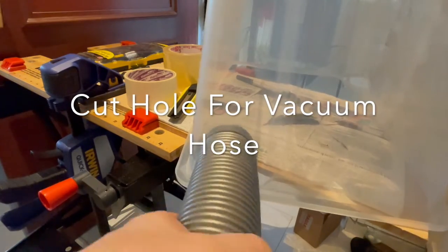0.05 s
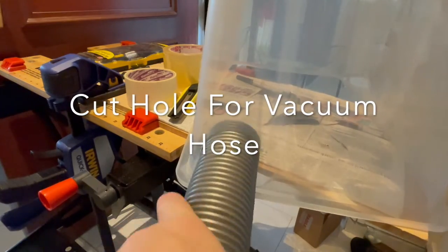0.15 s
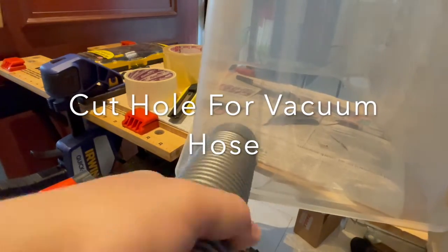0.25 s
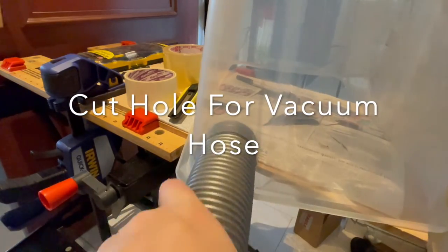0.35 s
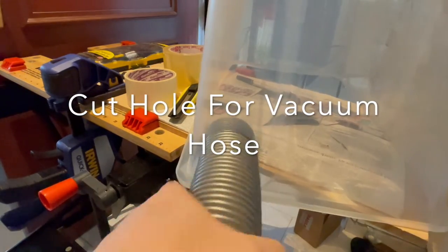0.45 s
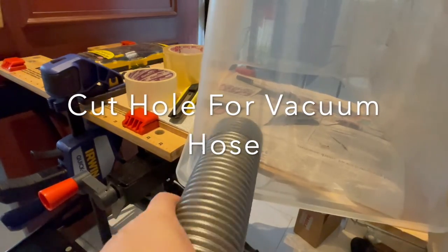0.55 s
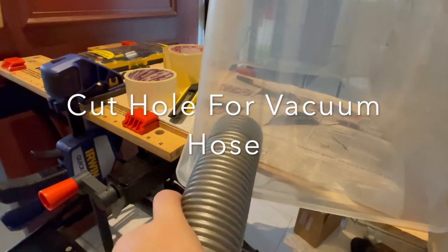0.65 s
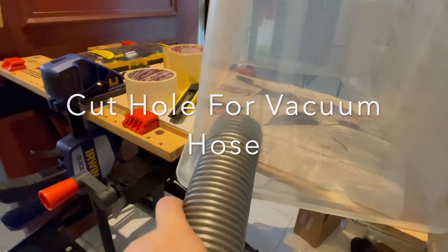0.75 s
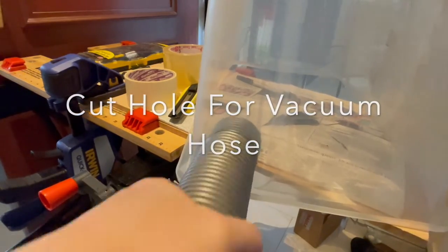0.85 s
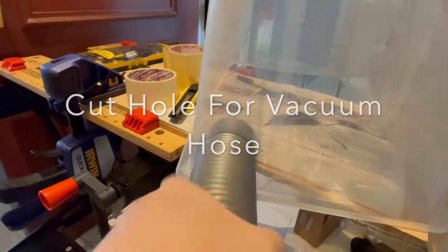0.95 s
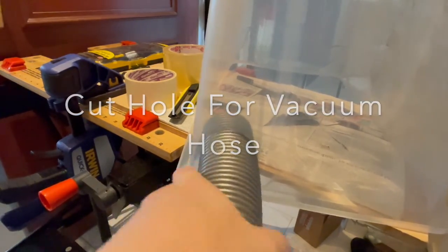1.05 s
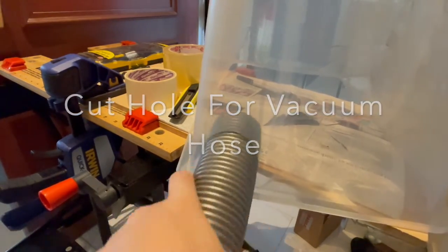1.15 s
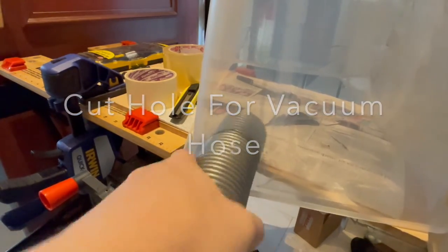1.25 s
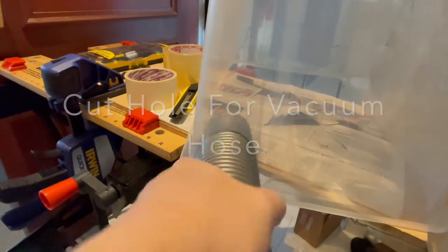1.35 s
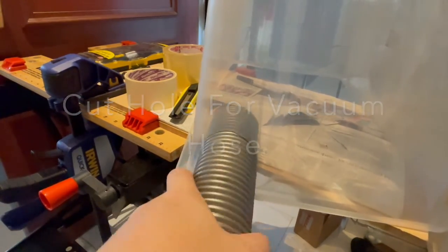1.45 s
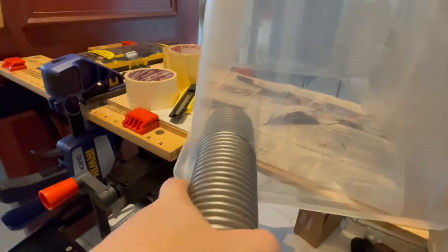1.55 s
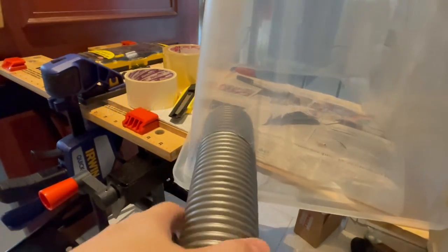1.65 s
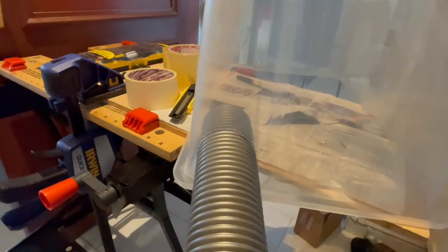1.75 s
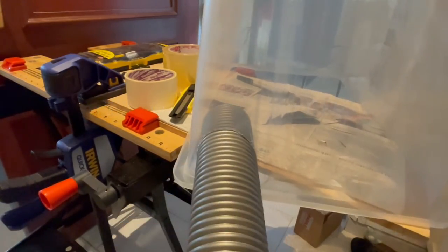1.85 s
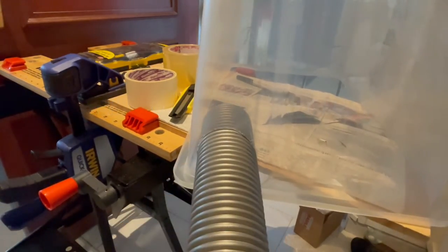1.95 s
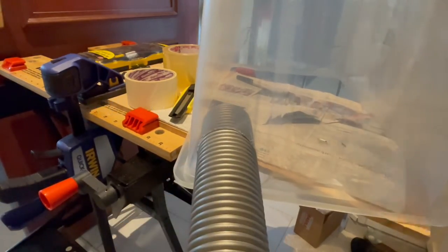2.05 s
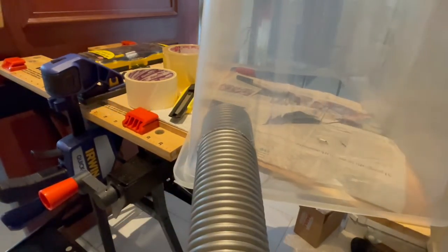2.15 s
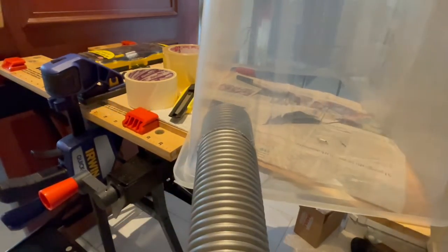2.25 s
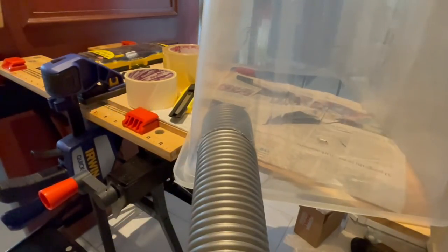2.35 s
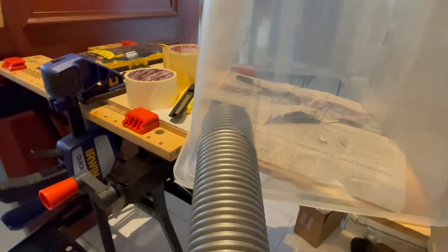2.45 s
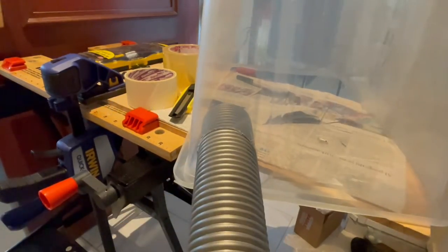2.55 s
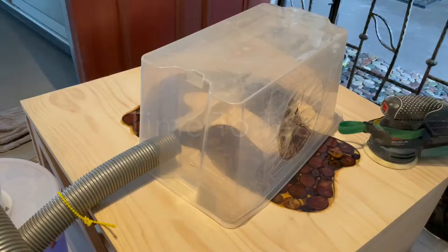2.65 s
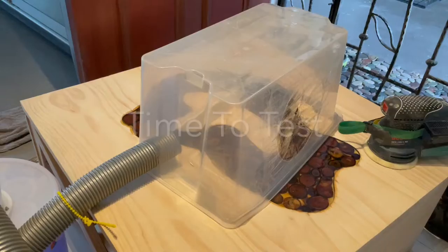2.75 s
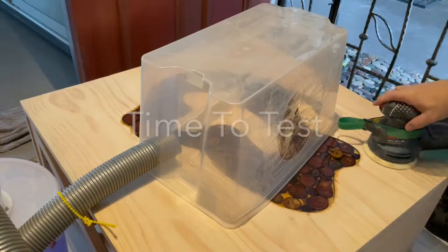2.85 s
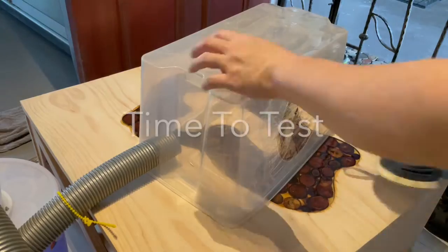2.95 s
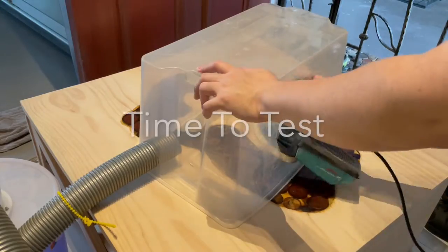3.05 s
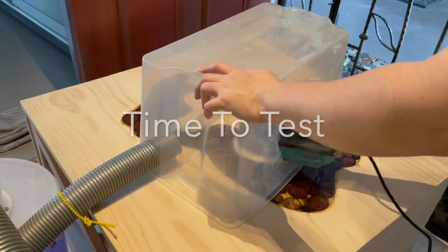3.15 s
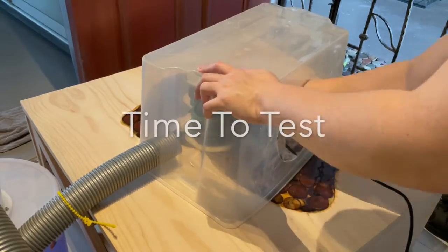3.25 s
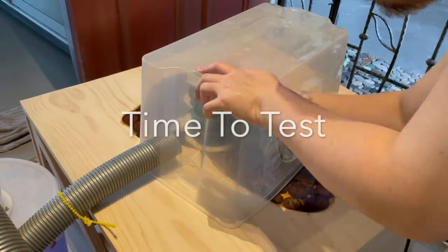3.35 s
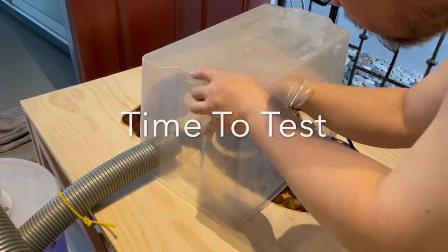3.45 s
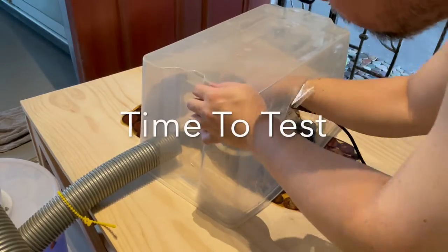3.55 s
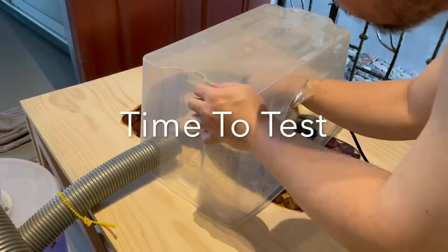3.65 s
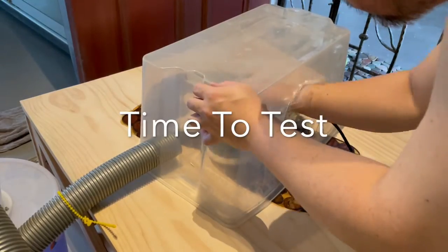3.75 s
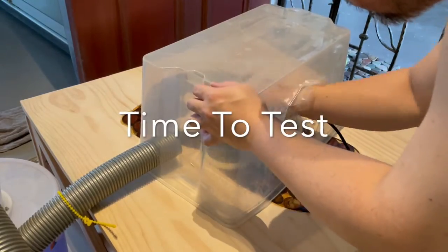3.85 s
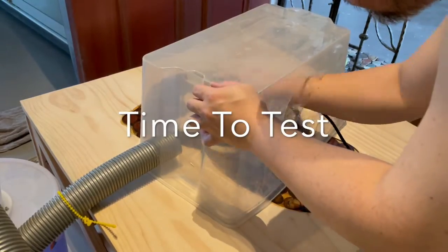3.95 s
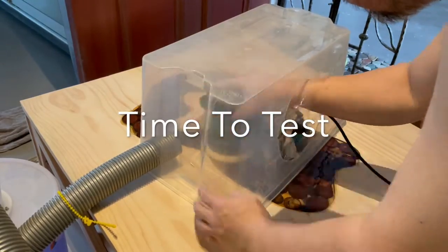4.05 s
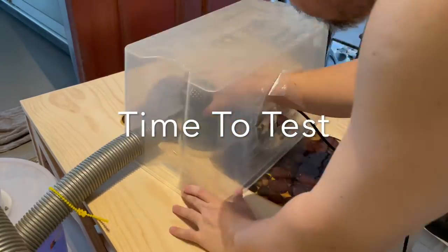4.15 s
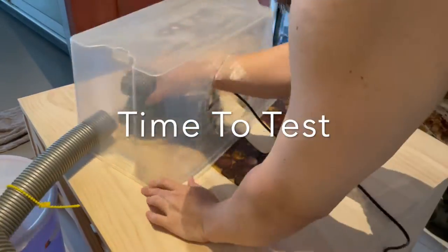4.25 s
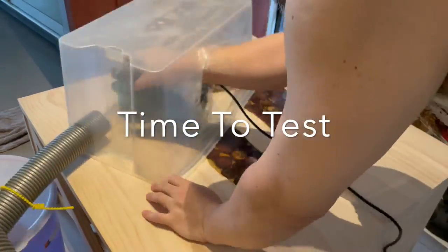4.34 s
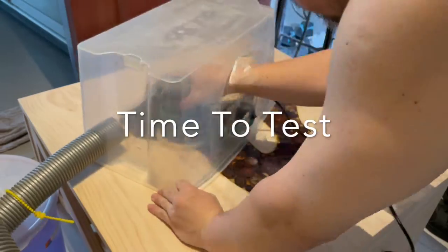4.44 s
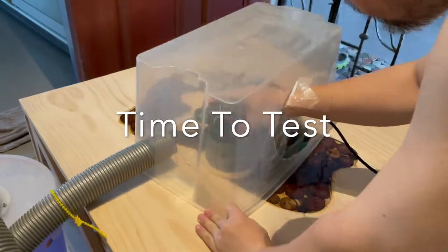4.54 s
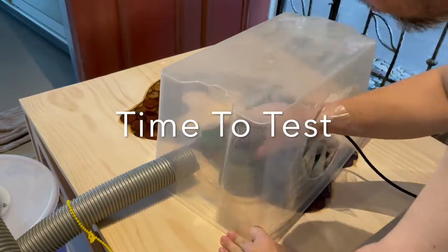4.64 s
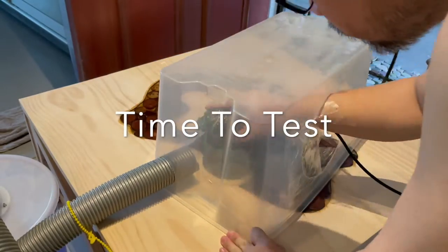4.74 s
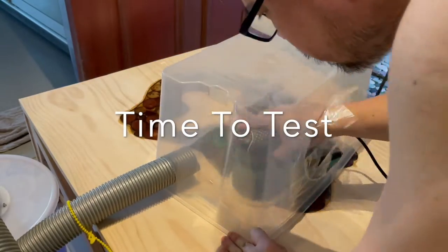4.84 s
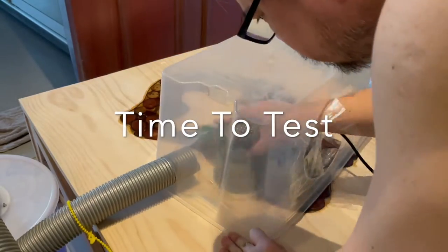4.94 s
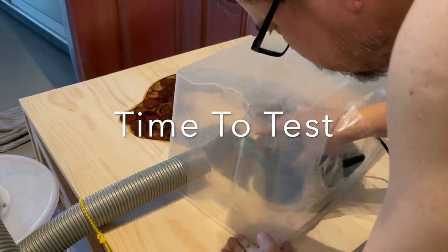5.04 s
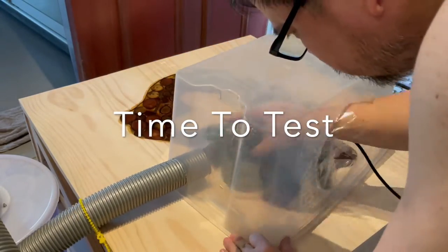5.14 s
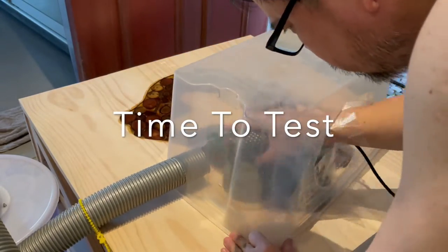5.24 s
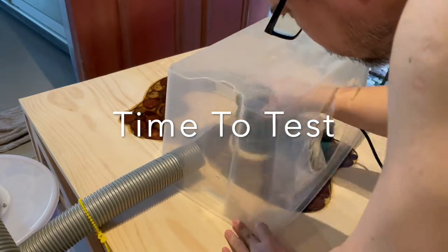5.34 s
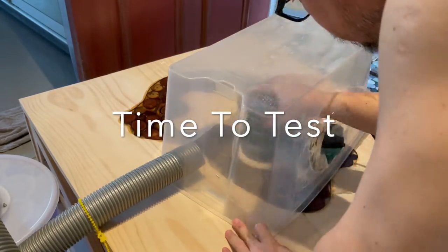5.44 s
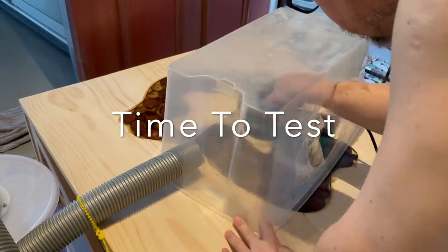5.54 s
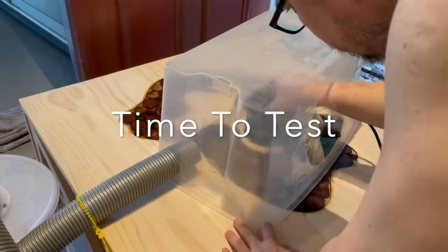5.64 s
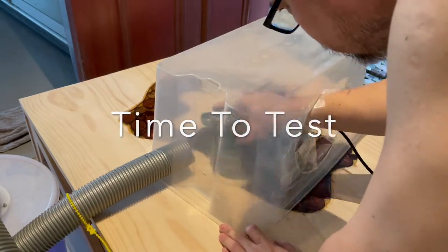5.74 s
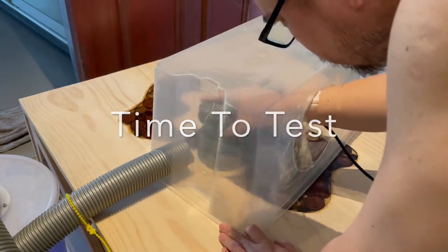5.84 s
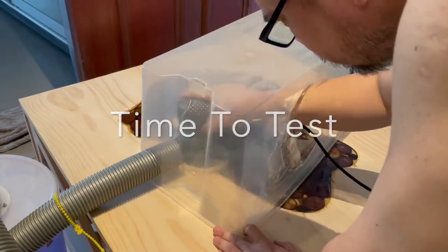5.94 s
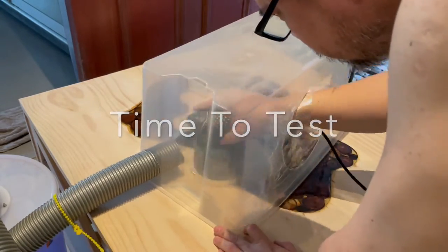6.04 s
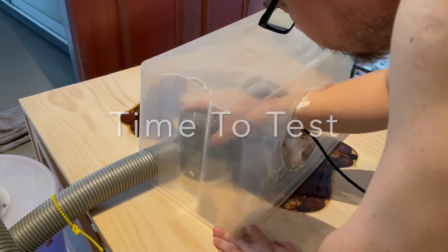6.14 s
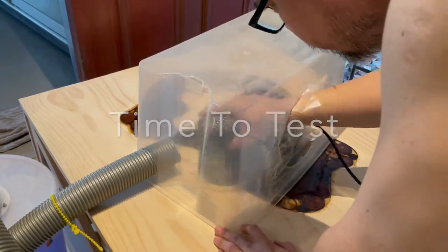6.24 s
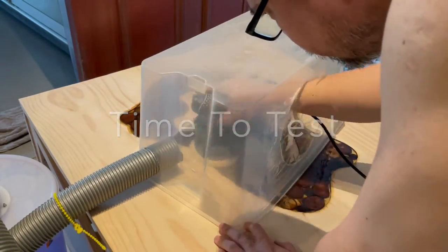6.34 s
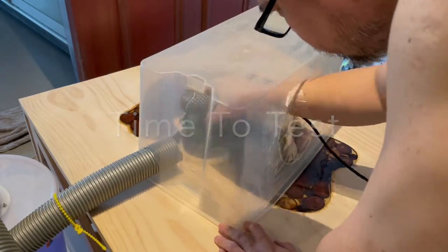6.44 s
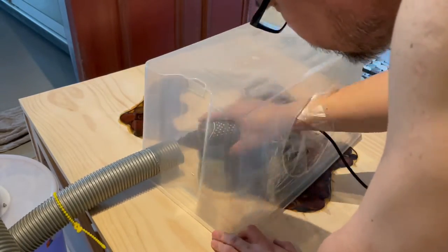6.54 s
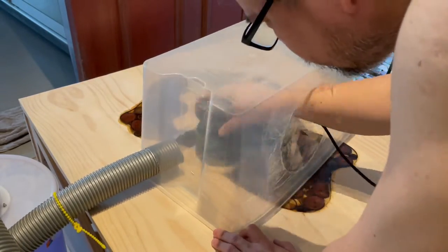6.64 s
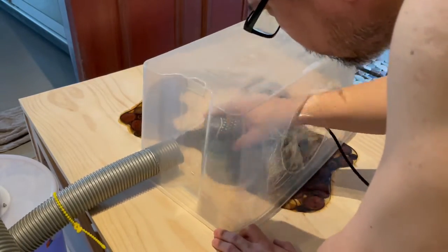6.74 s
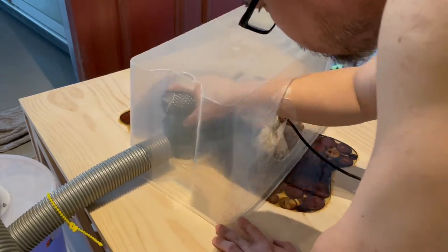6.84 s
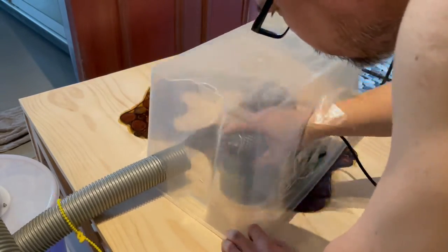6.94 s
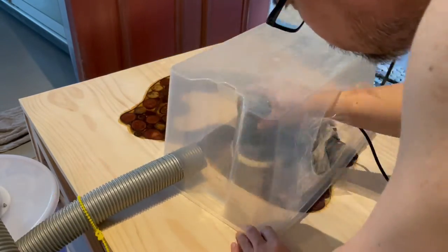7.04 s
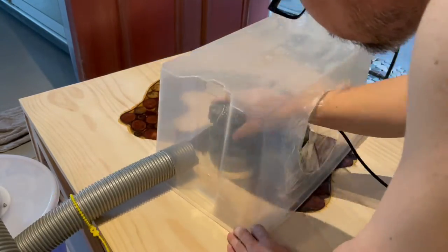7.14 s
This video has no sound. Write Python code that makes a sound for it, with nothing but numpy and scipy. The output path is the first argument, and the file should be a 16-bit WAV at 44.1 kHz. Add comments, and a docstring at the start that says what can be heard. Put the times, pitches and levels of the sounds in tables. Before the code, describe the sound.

A ribbed hose snaps and scrapes through a plastic box, then abruptly vacuum rush and whistle, joined by a power tool spinning up to a whine.

```python
"""In a workshop, a ribbed vacuum hose is worked into a hole in a plastic box: it rubs and groans, and each rib
snaps past the edge, sending dispersive bending waves through the thin wall and ringing its modes.
After an abrupt change of scene a workshop vacuum sucks air through the box: coloured noise, motor tones, a whistle.
A router inside hums, then spins up to a high, fluttering stack of partials that sags a little under load,
while the box is nudged over the bench with dull ticks and short rings."""
import sys
import numpy as np
from scipy import signal
from scipy.fft import rfft, irfft, next_fast_len
from scipy.io import wavfile

SR = 44100
rng = np.random.default_rng(int(sys.argv[2]) if len(sys.argv) > 2 else 0)


def to_wav(sig):
    """Store sig (one row per channel, or 1-D mono) as 16-bit WAV at the path in sys.argv[1].

    Samples outside -1..1 are clipped; the rate is SR.
    """
    pcm = np.clip(np.atleast_2d(sig), -1, 1) * 32767
    pcm = np.round(pcm).astype(np.int16)
    wavfile.write(sys.argv[1], SR, pcm.T)  # frames by channels


N = 317079
T = np.arange(N) / SR  # seconds
CHANGE_S = 2.634  # the fitting of the hose gives way to the machines


def undb(db):
    """Decibels to gain."""
    return 10 ** (np.asarray(db) / 20)


def unit(x):
    """Scale to an rms of one."""
    return x / np.sqrt(np.mean(np.abs(x) ** 2))


def curve(rows):
    """Rows of (seconds, value), joined by straight lines in time."""
    return np.interp(T, *np.transpose(rows))


def colour(points, hz):
    """Gain at the given frequencies of a spectrum drawn as (Hz, dB) points."""
    point_hz, db = np.transpose(points)
    return undb(np.interp(np.log(hz + 1), np.log(point_hz), db))


def pan(db):
    """Left and right gains for a level difference, left minus right."""
    return undb(np.array([[db], [-db]]) / 2)


def noise(points, wide_hz, spread=1.0, size=N, ripple_db=0, ripple_hz=70):
    """Coloured stereo noise, alike on both sides in the bass and wider above wide_hz; crowded resonances ripple it."""
    padded = next_fast_len(size, True)
    hz = np.fft.rfftfreq(padded, 1 / SR)
    knots = rng.standard_normal(1024)
    bumpy = np.interp(hz / ripple_hz, np.arange(len(knots)), knots)
    ripple = undb(ripple_db * hz / (hz + 1500) * bumpy)  # stronger in the treble
    mid, side = rfft(rng.standard_normal((2, padded))) * colour(points, hz) * ripple
    mid = irfft(mid, padded)
    side = irfft(side * spread * hz / (hz + wide_hz), padded)
    return np.array([mid + side, mid - side])[:, :size] / np.std(mid)


def walk(rate):
    """Smooth random wandering with a spread near one, taking rate new values a second."""
    knots = rng.standard_normal(int(N / SR * rate) + 2)
    return 1.196 * np.interp(T * rate, np.arange(len(knots)), knots)


def flutter(width_hz, slowest_hz=1, size=16384):
    """Random swings of strength and phase that give a tone skirts; width_hz sets how far they reach."""
    hz = np.abs(np.fft.fftfreq(size, T[-1] / size))
    skirt = np.exp(-hz / (2 * width_hz)) * hz / (hz + slowest_hz)
    chance = rng.standard_normal(size) + 1j * rng.standard_normal(size)
    swings = unit(np.fft.ifft(chance * skirt))
    return np.interp(T, np.linspace(0, T[-1], size), swings)


def turns(hz):
    """Running phase in radians of a pitch curve."""
    return 2 * np.pi * np.cumsum(hz) / SR


def fade(t, t60):
    """Exponential decay, 60 dB down after t60 seconds."""
    return np.exp(-np.log(1000) * t / t60)


def add(out, s, sound):
    """Mix a short sound in at time s."""
    start = max(int(s * SR), 0)
    out[:, start:start + sound.shape[1]] += sound[:, :N - start]


def scatter(start_s, end_s, count):
    """Rows of (time, two random values) for events strewn unevenly over a span."""
    chance = rng.random((count, 3))
    times = start_s + (end_s - start_s) * (np.arange(count) + chance[:, 0]) / count
    return np.column_stack([times, np.sqrt(3) * (2 * chance[:, 1:] - 1)])


# How hard the hose rubs in the hole. Each row: time in seconds, level in dB.
RUB = [(0.0, -46.5), (0.43, -35), (0.56, -44), (0.8, -46), (0.97, -41), (1.35, -35), (1.55, -46),
       (2.0, -54.5), (2.4, -62)]
# Colour of the scrape. Each row: frequency in Hz, relative level in dB.
RUB_COLOUR = [(40, -16), (100, -6), (165, -3), (320, -0.5), (500, -2), (800, -6.5), (2000, -11.5),
              (4000, -37), (9000, -31.5), (15000, -27)]
# The wall groaning as a rib drags. Each row: start in seconds, length in seconds, pitch in Hz, peak level in dB.
GROANS = [(0.45, 0.096, 166.4, -31), (0.715, 0.074, 164.7, -34), (0.805, 0.079, 160.5, -25.5),
          (1.718, 0.052, 171, -29), (2.597, 0.026, 121, -38)]


def rubbing(rub_db=-3, grain_db=3, slips_per_s=90, slip_db=-8, slip_t60=0.016):
    """The hose scrapes unevenly between snaps, slips in tiny ticks and now and then makes the wall groan."""
    pressure = undb(curve(RUB))
    scrape = noise(RUB_COLOUR, 830) * undb(rub_db + grain_db * walk(130))
    slips = (rng.random(N) < slips_per_s / SR) * rng.uniform(.2, 1.8, N)
    slips = signal.fftconvolve(slips, fade(T[:2048], slip_t60))[:N]
    tick_colour = [(200, -8), (500, 5), (1900, -1), (4000, -3), (9000, -16), (14000, -18)]  # Hz, dB
    ticks = noise(tick_colour, 900) * slips
    out = (scrape + undb(slip_db) * ticks) * pressure
    for s, length, hz, db in GROANS:
        t = np.arange(int(length * SR)) / SR
        groan = np.sin(np.pi * t / length) * np.sin(2 * np.pi * hz * t)
        add(out, s, undb(db) * groan[None])
    return out


# Colour of the hush behind the fitting. Each row: frequency in Hz, relative level in dB.
QUIET_COLOUR = [(25, -27), (55, -13), (80, -16), (108, 0.5), (150, -10), (200, -20), (350, -17),
                (700, -23.5), (1200, -29), (2800, -30), (4500, -36), (9000, -41), (15000, -43)]


def quiet_room(quiet_db=-48.5):
    """A hush of bass-heavy noise whose level drifts slightly."""
    return noise(QUIET_COLOUR, 500) * undb(quiet_db + 1.5 * walk(14))


# Ribs snapping past the edge. Each row: start in seconds, relative level in dB, brightness in dB per octave,
# clack of the wall's middle range in dB.
SNAPS = [(0.012, -17, -0.5, 1), (0.109, -21, 0.5, 1.5), (0.236, -34, 0, 10), (0.247, -19, 0, 5.5),
         (0.386, -28, 1.8, -7.5), (0.411, -31.5, -0.5, -1), (0.441, -32.5, -1, -11), (0.501, -35.5, 0.5, 5),
         (0.551, -21.5, 2.5, 1.5), (0.711, -35.5, 0.5, 6.5), (0.878, -21, -.5, 7), (0.985, -17, -0.2, -1),
         (1.075, -33.5, -1, -8), (1.178, -21.5, 3, 0), (1.319, -35.5, 4.5, 2), (1.33, -20.5, -0.5, 6),
         (1.408, -35, 1.5, 9.5), (1.433, -34, -2.5, 0), (1.511, -32, 5, -2.5), (1.718, -33, -1.5, -13),
         (1.749, -41.5, -1, -1), (1.809, -43, -3, -6.5), (2.604, -54, -0.5, 12)]
# Colour of one snap. Each row: frequency in Hz, relative level in dB.
SNAP_COLOUR = [(30, -24), (80, -16), (140, 2), (250, 10.5), (370, 6), (480, 11), (720, -2), (1100, -3.5),
               (1450, -4), (1900, -4.5), (2700, -6.5), (5000, -8), (9000, -10), (13500, -18), (15500, -23)]
# Balance of an ordinary snap. Each row: frequency in Hz, gain in dB.
SNAP_BODY = [(450, 4), (950, -0.5), (2200, 0), (5000, -5)]
# The range lifted by clack. Each row: frequency in Hz, gain in dB for each dB of clack.
CLACK_BAND = [(450, 0), (950, 1), (2200, 1), (5000, 0)]
# Modes of the box wall. Each row: frequency in Hz before detuning, relative level in dB, t60 in seconds.
WALL = [(158.8, -8, 0.22), (271, -10, 0.096), (321, -5, 0.11), (449.7, 2.5, 0.086), (544.3, -6, 0.21),
        (1074, 10.5, 0.059), (1862, 17, 0.031)]


def snaps(size=16384, snap_db=34, crack=0.24, crackle_t60=0.017, crackle_growth=0.14, push_hz=2600,
          ring_db=-44, lag_s=0.01625, lag_hz=130, build_s=0.00052):
    """Each snap bends the wall; bending waves carry the treble first and the bass later, then the modes ring on."""
    out, t, hz = np.zeros((2, N)), np.arange(size) / SR, np.fft.rfftfreq(size, 1 / SR)
    delay = lag_s / (1 + hz / lag_hz)
    bending = colour(SNAP_COLOUR, hz) * np.exp(-2j * np.pi * np.cumsum(delay) * SR / size)
    push = np.exp(-2j * np.pi * hz * 0.00069) / (1 + (hz / push_hz) ** 2)  # the dull release of the rib
    octaves = np.log2(np.clip(hz, 450, 5000) / 1500)
    lead = size // 32  # samples kept free ahead of the snap
    for s, db, bright_db, clack_db in SNAPS + rattles():
        blow = crack * noise([(300, -6.5), (1200, 4.0), (4000, -3.0)], 1240, spread=1.23, size=size)
        blow *= fade(t, crackle_t60 * np.exp(crackle_growth * bright_db))  # bright snaps crackle longer
        blow *= 1 - np.exp(-(t / build_s) ** 2)
        for f, mode_db, t60 in WALL:
            detune, strength = rng.standard_normal(2)  # the wall is stressed differently each time
            ring = np.cos(2 * np.pi * f * (1 + 0.017 * detune) * t) * fade(t, t60)
            blow += undb(ring_db + mode_db + 2 * strength) * ring
        weight = colour(SNAP_BODY, hz) * undb(db + bright_db * octaves) * colour(CLACK_BAND, hz) ** clack_db
        sound = np.roll(irfft((rfft(blow) + push) * bending * weight), lead, axis=1)
        add(out, s - lead / SR, undb(snap_db) * sound)
    return out


def rattles(count=32, until_s=1.6, level_db=-4, scatter_db=2.8, bright_db=0, clack_db=3):
    """Light snaps at random between the ribs, their strength following the rubbing that shakes them loose."""
    rows = []
    for s, strength, hardness in scatter(.15, until_s, count=count):
        rub_db = np.interp(s, *np.transpose(RUB))
        rows.append((s, rub_db + level_db + scatter_db * strength, bright_db + hardness, clack_db))
    return rows


def room(x, wet_db=-9, t60=0.25, size=22050):
    """The workshop answers with a short, diffuse tail."""
    t = np.arange(size) / SR
    tail_colour = [(100, -9), (450, -2), (1200, -1.5), (3000, 4.5), (7000, 7.5), (14000, 0.5)]  # Hz, dB
    tail = noise(tail_colour, 740, spread=1.03, size=size)
    tail *= fade(t, t60) * (1 - np.exp(-t / 0.0036))
    tail /= np.sqrt(np.sum(tail ** 2) / 2)
    return x + undb(wet_db) * signal.fftconvolve(x.mean(0)[None], tail, axes=1)[:, :N]


# Colour of the air rushing through the box. Each row: frequency in Hz, relative level in dB.
SUCTION_COLOUR = [(40, -37), (170, -32.5), (290, -23.5), (420, -6.5), (500, -15), (620, 4), (880, -11),
                  (1250, -4), (1600, 5.5), (1900, -4.5), (3000, -6.5), (5200, -9), (7300, -7.5),
                  (15500, -18)]
# Vacuum motor tones. Each row: multiple of the motor pitch, rms level in dB before wavering.
MOTOR = [(1, -45.5), (2, -43), (4, -46.5), (5, -50.5), (6, -58), (7, -52.5)]


def vacuum(air_db=-33, motor_hz=799.55, waver=0.087, whistle_hz=3057, creep_hz_per_s=2,
           whistle_db=-31, swell_db=8.5, swell_s=0.42, third_db=-50):
    """Rushing air, steady motor tones and a thin whistle that swells with the air flow and creeps upward."""
    out = noise(SUCTION_COLOUR, 1100, spread=0.56, ripple_db=-1.0) * undb(air_db + 0.16 * walk(25))
    for k, db in MOTOR:
        sides = 1 + waver * np.array([flutter(4.5), flutter(4.1)])
        out += np.sqrt(2) * undb(db) * np.real(sides * np.exp(2j * np.pi * k * motor_hz * T))
    since = T - CHANGE_S
    phase = turns(whistle_hz + creep_hz_per_s * since + 2.49 * walk(3) + 1.36 * walk(14))
    swell = swell_db * np.clip(since / swell_s - 1, -1, 0)
    ports = np.array([[0], [1.25]])  # radians: the whistle reaches the two sides out of step
    whistle = undb(whistle_db + swell + 0.44 * walk(12)) * np.sin(phase + ports) * pan(-5)
    overtone = undb(third_db) * np.interp(T, [3.35, 3.6], [1, .45]) * np.sin(3 * phase)
    return out + np.sqrt(2) * (whistle + overtone)


# The box bumped while the machines run. Each row: start in seconds, level in dB,
# hardness as the tilt of the ring in dB per octave.
BUMPS = [(3.275, -35, -9), (3.48, -34.5, -17), (4.254, -26, 22), (4.406, -22, 14), (5.01, -27, 17),
         (5.53, -30, 21), (5.913, -36, -23), (6.0, -30, -2), (6.575, -31, 22), (6.875, -31, -2),
         (7.035, -22.5, 10)]
# Modes of the box on the bench. Each row: frequency in Hz, relative level in dB, t60 in seconds.
BOX = [(1053, -0.5, 0.11), (1270, -23, 0.036), (1690, 2.5, 0.082), (1830, -8, 0.072), (2140, -11, 0.026)]


def bumps(size=8192, tick_db=-3, tick_t60=0.09, nudge_count=7, nudge_from_s=4.6, nudge_db=-32.5, nudge_hardness_db=7):
    """A dull tick and a brief ring of the box, too light to carry any bass."""
    out, t = np.zeros((2, N)), np.arange(size) / SR
    # lighter nudges come at random while the router is steered
    nudges = [(s, nudge_db + 2 * strength, nudge_hardness_db + 5 * hardness)
              for s, strength, hardness in scatter(nudge_from_s, T[-1], count=nudge_count)]
    tick_colour = [(250, 1), (700, -9), (2000, 4), (6000, -6), (15000, -22)]  # Hz, dB
    for s, db, hardness_db in BUMPS + nudges:
        tick = noise(tick_colour, 1500, size=size) * fade(t, tick_t60)
        ring = np.zeros(size)
        for hz, mode_db, t60 in BOX:
            gain = undb(mode_db + hardness_db * np.log2(hz / 1500))
            ring += gain * np.sin(2 * np.pi * hz * t + rng.uniform(0, 2 * np.pi)) * fade(t, t60)
        onset = 1 - np.exp(-t / 0.00036)
        add(out, s, undb(db) * (ring + undb(tick_db) * tick) * onset)
    return signal.sosfilt(signal.butter(4, 450, "high", fs=SR, output="sos"), out)


START_S = 3.7  # the router starts to turn
# Running pitch of the router, sagging under load. Each row: time in seconds, pitch in Hz once spun up.
SPEED = [(4.17, 1520), (4.5, 1552), (4.72, 1556), (5.03, 1541), (5.13, 1548), (5.31, 1532), (5.48, 1566),
         (5.68, 1556), (5.83, 1532), (6.0, 1516), (6.27, 1501), (6.36, 1511), (6.59, 1512), (6.69, 1547),
         (6.97, 1530), (7.14, 1545)]
# Colour of the router's cooling air. Each row: frequency in Hz, relative level in dB.
COOLING_COLOUR = [(300, -14), (850, -30), (1080, 13), (1300, -15), (1750, 20), (2200, -21), (3500, 9),
                  (7000, 1.5), (11000, 5), (15500, 4)]


def router(start_share=0.645, spin_up_s=0.118, cooling_db=-39.5, hum_db=-50):
    """It hums when switched on, then spins up; the cooling air grows with its speed."""
    # it starts at a share of its running pitch and closes the gap exponentially
    gap = (1 - start_share) * np.exp(-np.maximum(T - START_S, -.02) / spin_up_s)
    hz = curve(SPEED) * (1 - gap)
    speed = hz / hz.max()
    air = noise(COOLING_COLOUR, 800, spread=0.47, ripple_db=-3.0) * undb(cooling_db + 2.3 * walk(30))
    air = air * speed ** 4 * pan(2.5)
    hum = np.real((1 + 0.34 * flutter(1.92)) * np.exp(2j * np.pi * 399 * T))
    hum *= np.interp(T, [3.57, 3.6], [0, 1])
    turning = np.interp(T - START_S, [-.02, .01], [0, 1])
    return (whine(hz, speed) + air) * turning + undb(hum_db) * hum


# Whine of the router as it is moved about in the box. Each row: time in seconds, relative level in dB.
WHINE = [(3.95, -19.5), (4.39, -21), (4.66, -16), (4.69, -21.5), (5.13, -18.5), (5.29, -24), (5.31, -19),
         (5.68, -15), (5.76, -23.5), (5.81, -17.5), (6.11, -21.5), (6.19, -19.5), (7.08, -22), (7.19, -20)]
# Resonances of the box that the rising pitch sweeps through. Each row: frequency in Hz, gain in dB.
BOX_GAIN = [(990, -15), (1075, 9), (1195, -8), (1265, 2), (1340, -15.5), (1435, 0), (1490, 0)]
# Partials of the whine. Each row: multiple of its pitch, relative level in dB at full speed,
# power of speed it grows with, skirt share, left minus right in dB.
PARTIALS = [(2, -33.5, 0.78, 0.98, 2.5), (3, -36, 1.4, 0.92, 3), (4, -35, 5.5, 0.67, 0.5),
            (5, -37, 2.4, 0.2, 4), (6, -49, 3.4, .3, 17), (7, -50.5, 3.3, 0.57, 10), (8, -51, 6, .5, 1)]


def whine(hz, speed, whine_db=-1, flutter_share=0.62, flutter_hz=20, partials_db=3, sizzle_db=-42.5, emerge=0.5):
    """The spinning router sings a stack of partials: each a narrow core in skirts of fluttering air."""
    phase = turns(hz)
    settled = np.interp(T - START_S, [.05, .35], [.3, 1])
    swing = flutter_share * settled
    tone = (1 + swing * flutter(flutter_hz, slowest_hz=7.1)) / np.sqrt(1 + swing ** 2) * np.exp(1j * phase)
    loudness = undb(curve(WHINE) + whine_db) * colour(BOX_GAIN, hz)
    out = np.sqrt(2) * tone.real * loudness * pan(8.6) ** settled
    for k, db, power, skirt, pan_db in PARTIALS:
        core = 0.38 + 0.29 * flutter(10.6) + 0.48 * np.array([flutter(13.5), flutter(7.3)])
        sides = core + skirt * np.array([flutter(36), flutter(26)])
        partial = np.real(sides * np.exp(1j * k * phase))
        out += partial * undb(partials_db + db) * speed ** power * settled ** emerge * pan(pan_db)
    # up to speed, the 22nd partial lies above half the sample rate and folds down:
    # a thin sizzle that falls as the speed rises
    sizzle_sides = flutter(35) + np.array([flutter(35), flutter(35)])
    sizzle = np.real(sizzle_sides * np.exp(22j * phase))
    return out + undb(sizzle_db) * sizzle * speed ** 2


def scene():
    """Fitting the hose in a quiet room, then the machines, with a few milliseconds of fade at the change."""
    fitting = (room(snaps() + rubbing()) + quiet_room()) * pan(3.1)
    machines = vacuum() + router() + bumps()
    fade_out = np.clip((CHANGE_S - .008 - T) / .006, 0, 1)
    fade_in = np.clip((T - CHANGE_S) / .006, 0, 1)
    return fitting * fade_out + machines * fade_in


def record(dry):
    """The microphone rounds the sharpest peaks and cuts the top above 15.9 kHz."""
    rounded = dry / (1 + dry ** 4) ** (1 / 4)
    return signal.sosfilt(signal.ellip(10, .1, 80, 15900, fs=SR, output="sos"), rounded)


dry = scene()
out = record(dry)
to_wav(out)
```